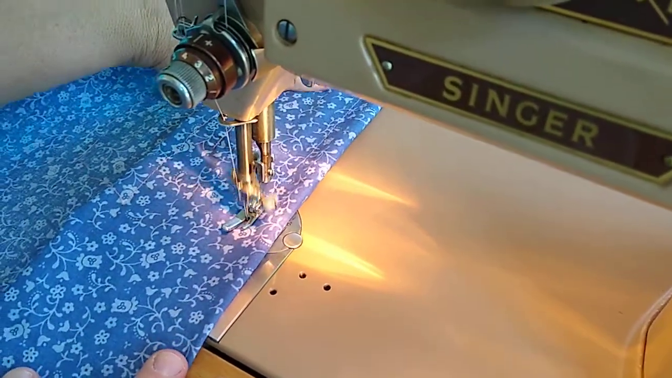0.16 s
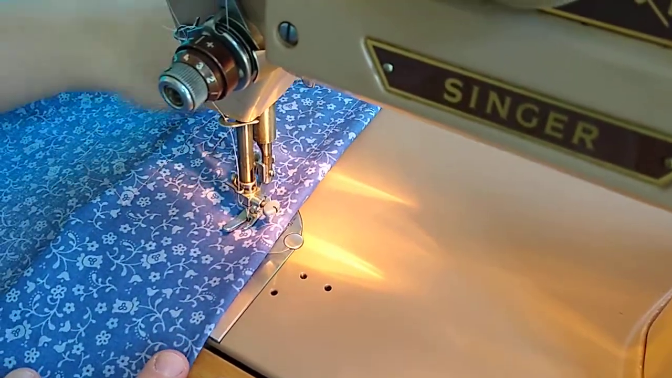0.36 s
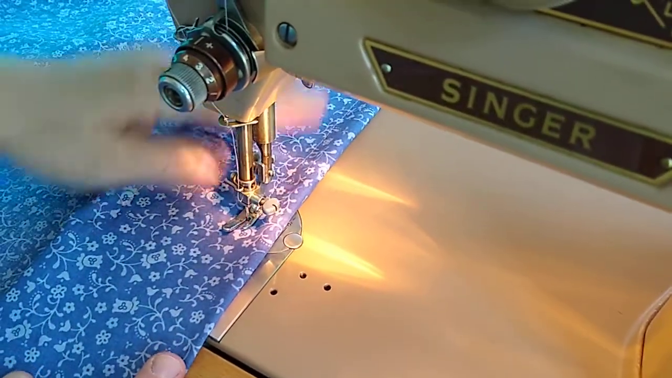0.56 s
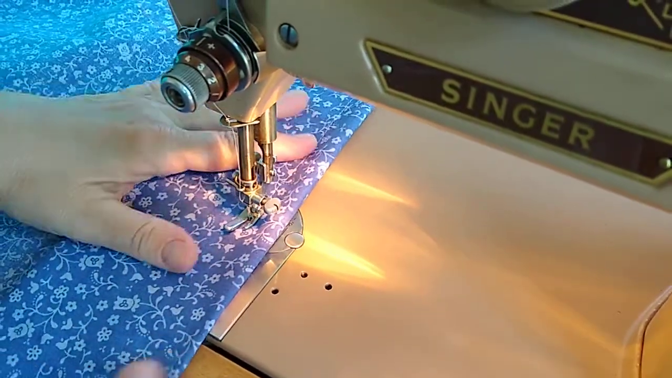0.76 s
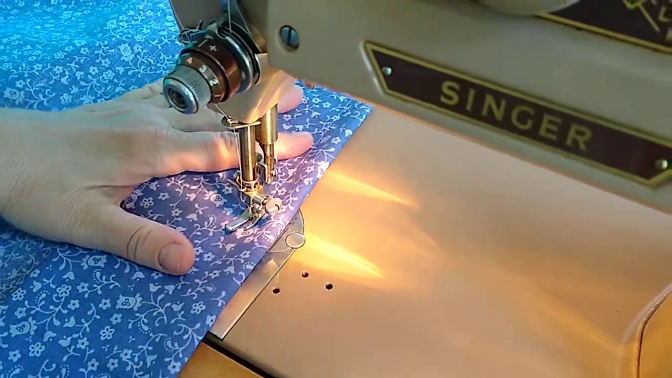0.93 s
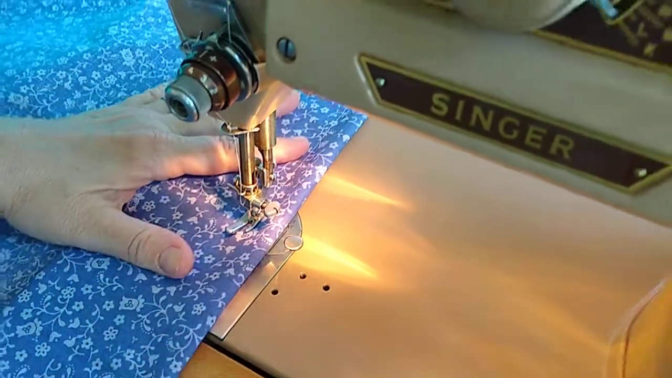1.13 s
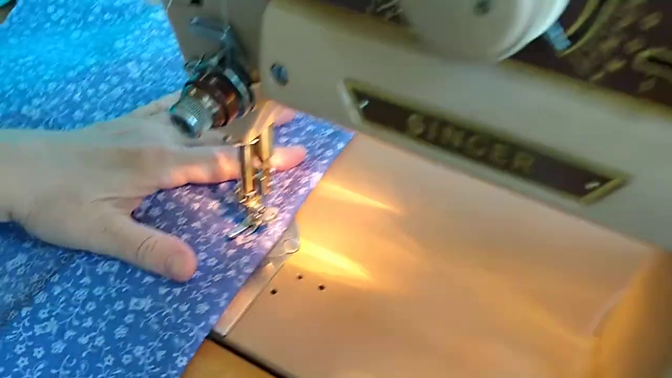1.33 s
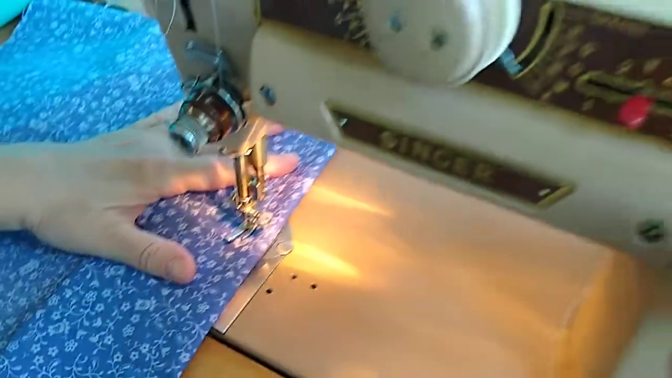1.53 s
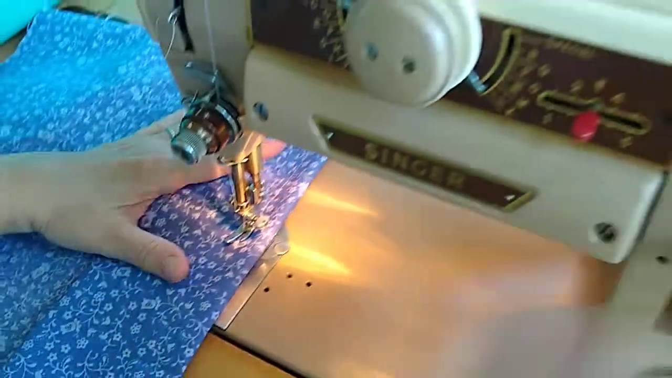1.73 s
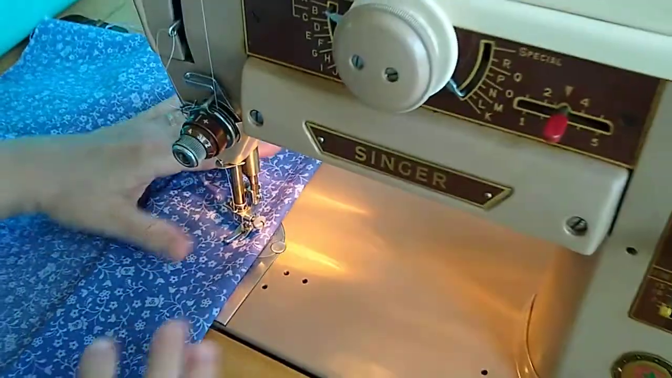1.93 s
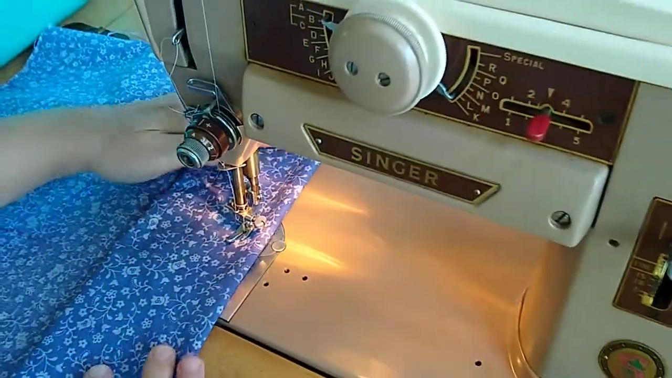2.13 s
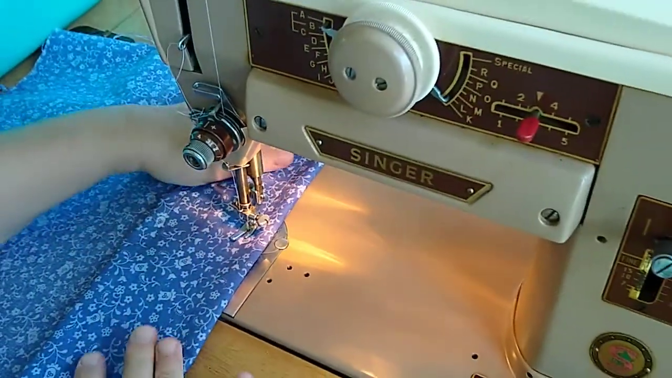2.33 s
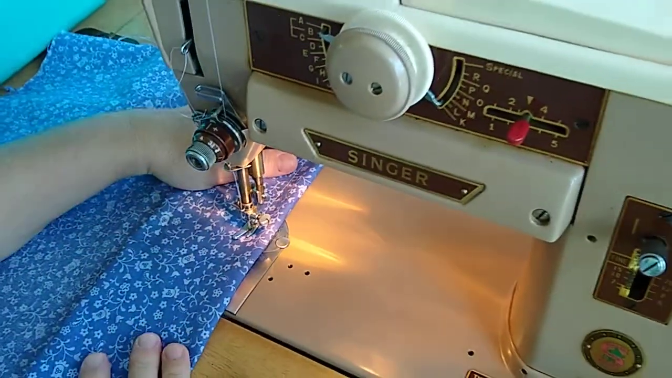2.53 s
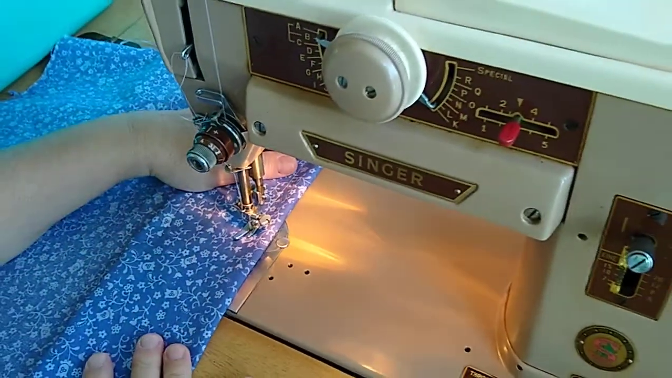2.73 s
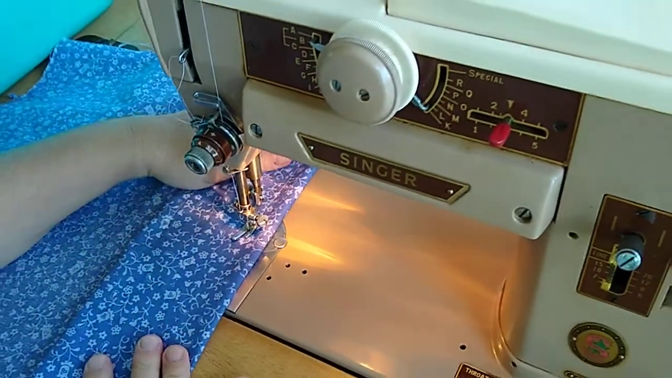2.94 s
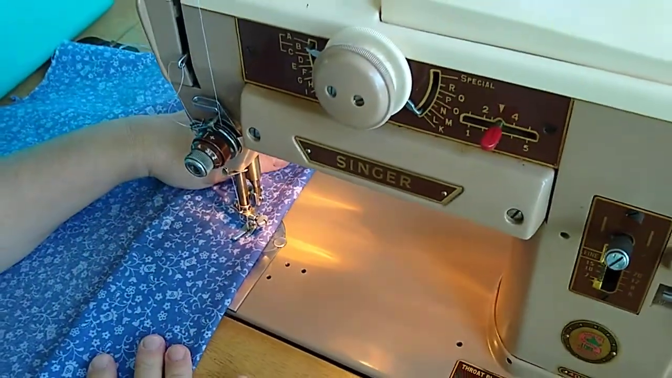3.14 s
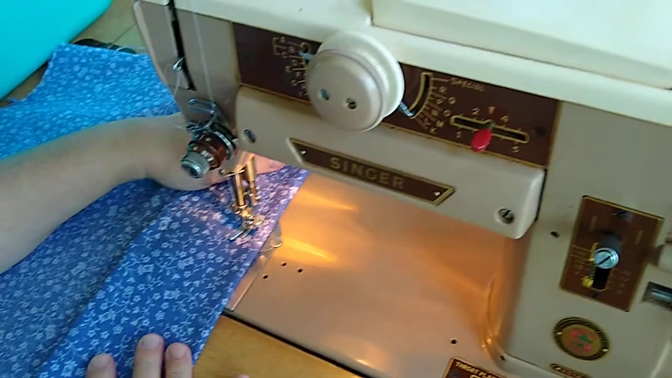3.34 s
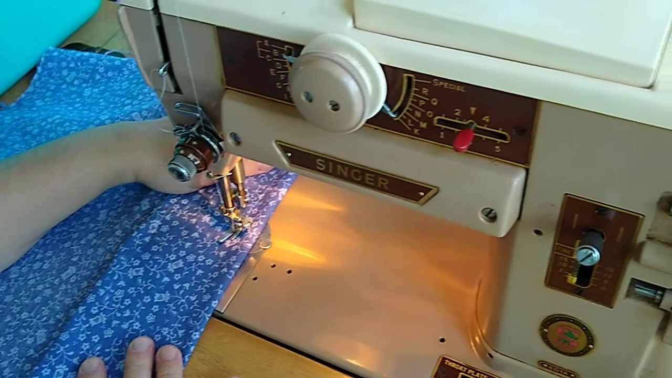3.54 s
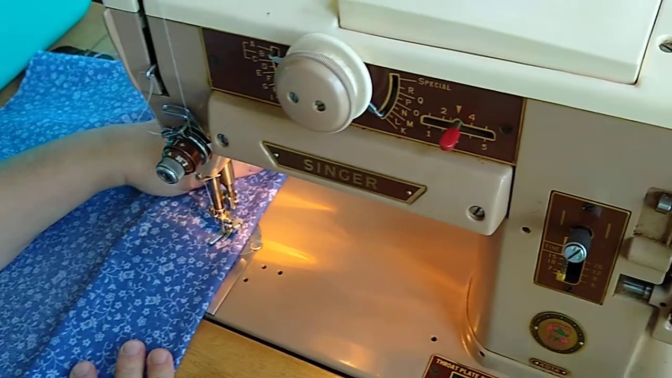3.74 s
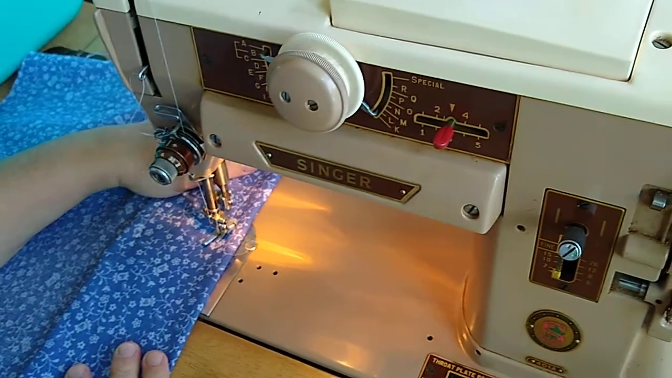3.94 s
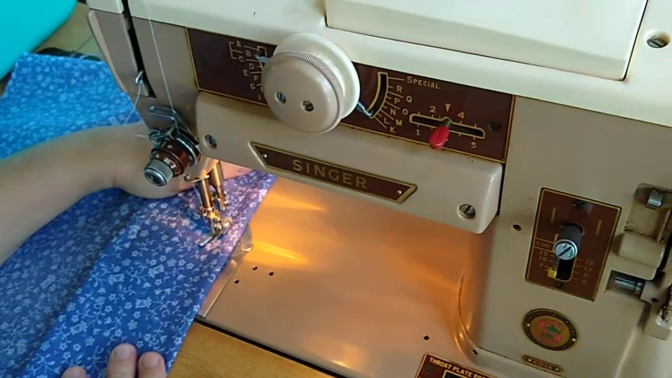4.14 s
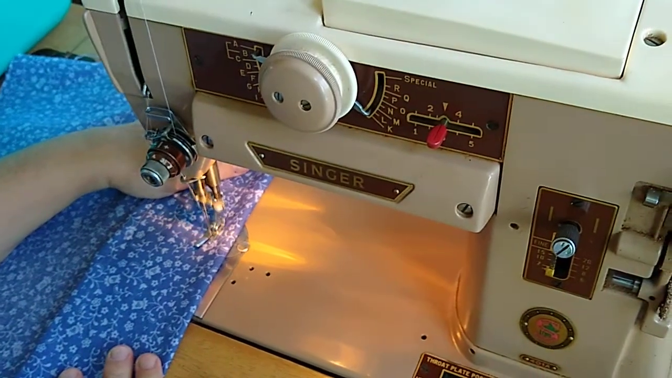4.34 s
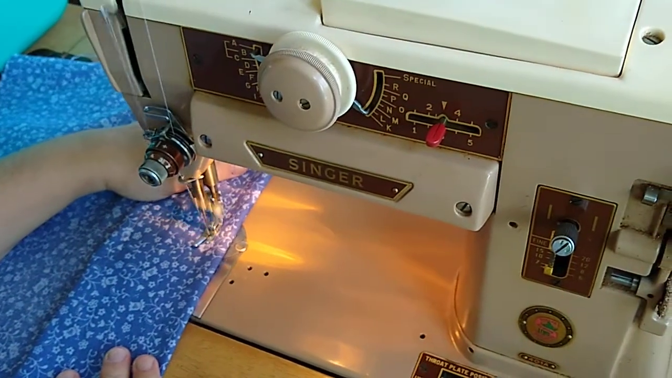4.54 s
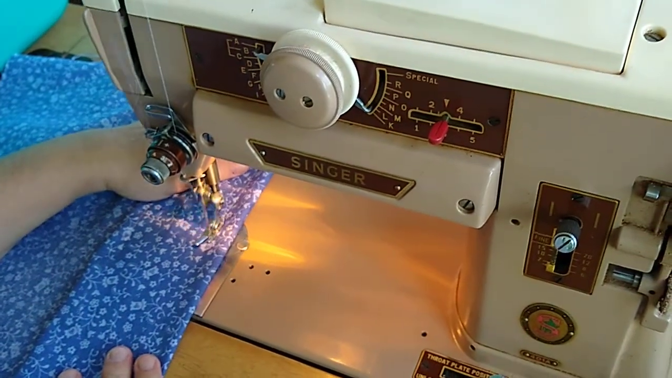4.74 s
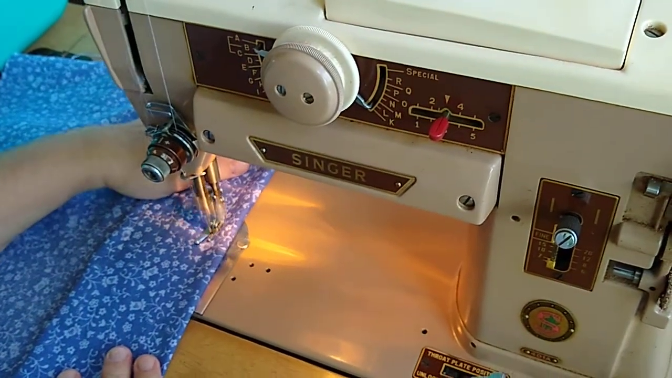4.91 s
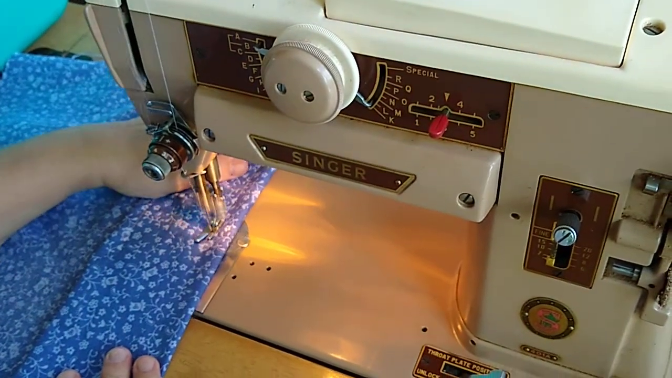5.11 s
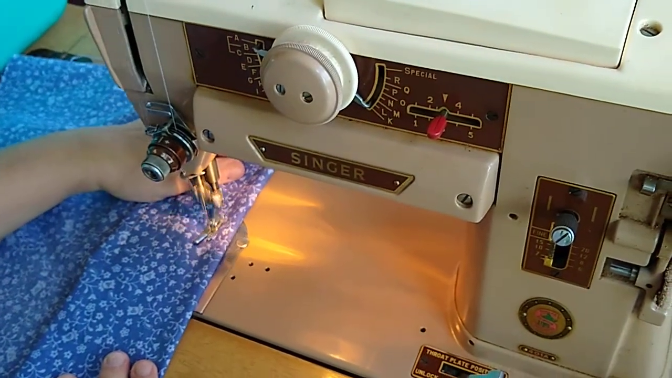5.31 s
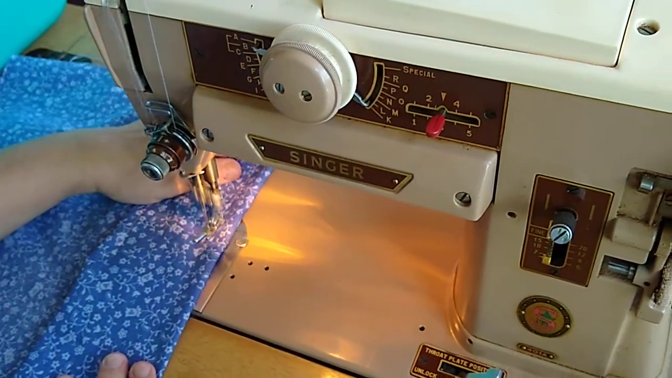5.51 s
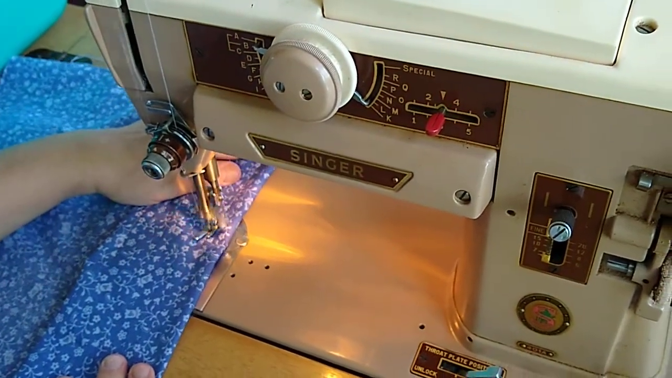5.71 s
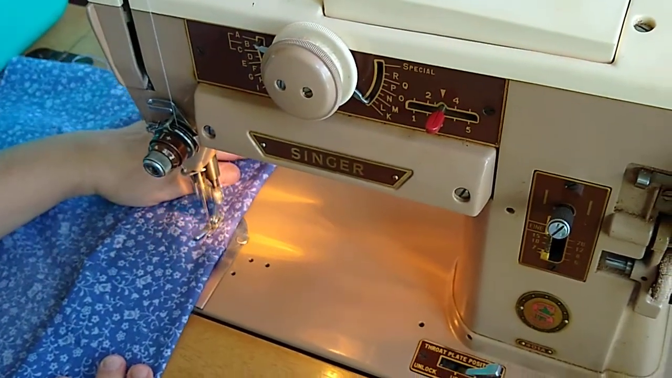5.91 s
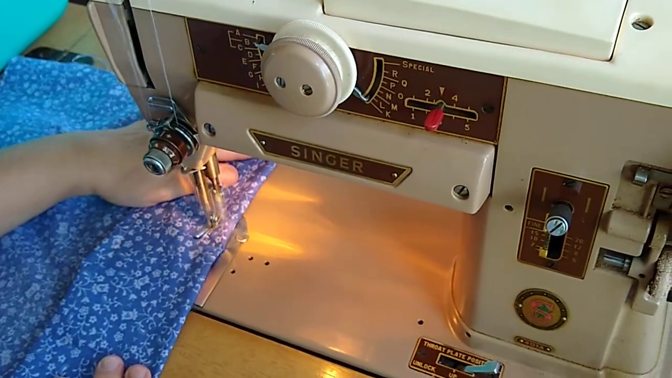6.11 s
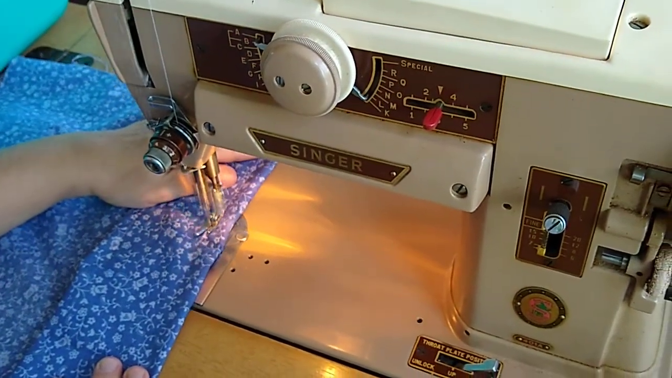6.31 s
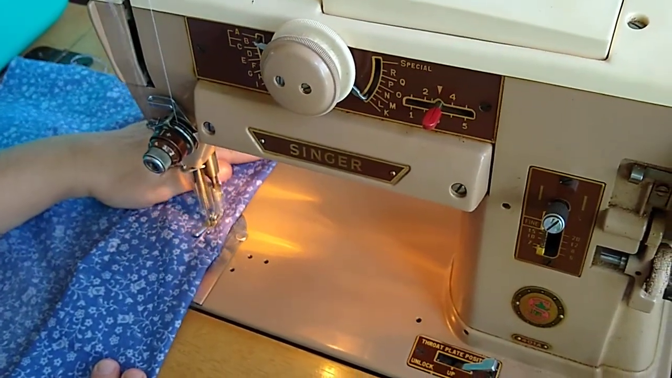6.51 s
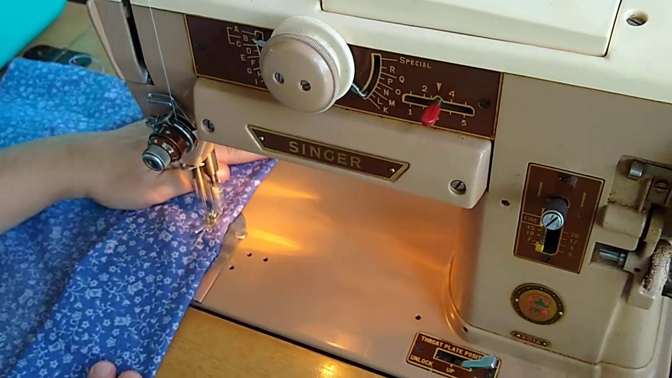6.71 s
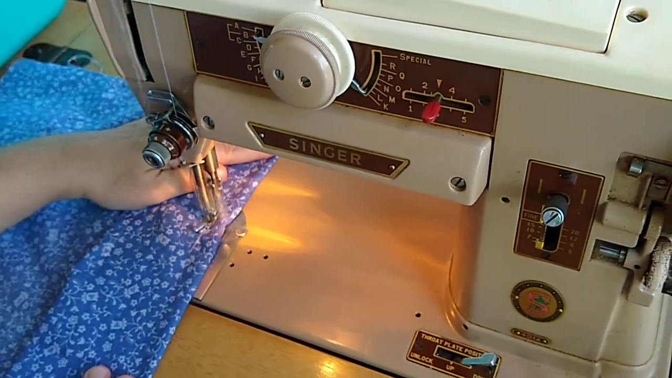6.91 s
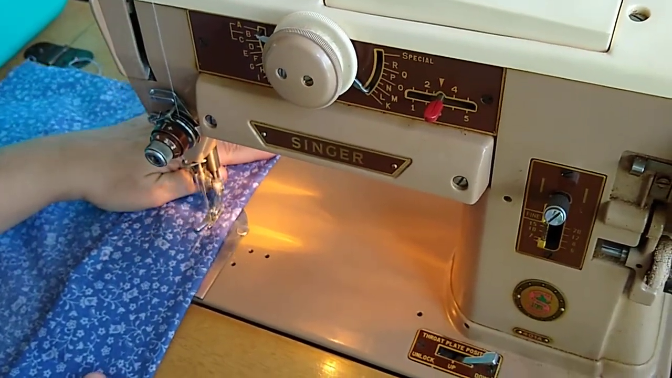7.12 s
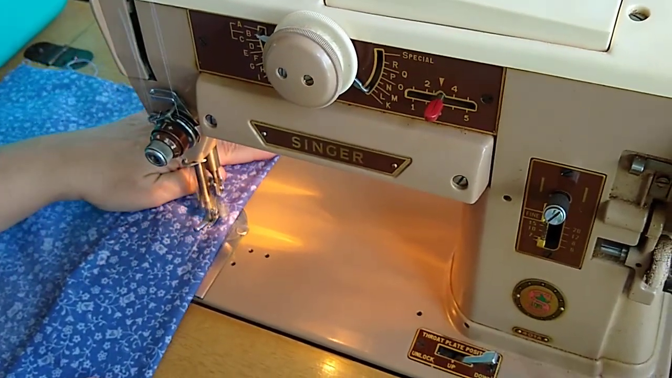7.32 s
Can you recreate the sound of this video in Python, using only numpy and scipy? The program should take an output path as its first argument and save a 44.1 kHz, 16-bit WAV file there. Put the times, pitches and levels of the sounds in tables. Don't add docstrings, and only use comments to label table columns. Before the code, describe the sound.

Close stereo pickup of a household sewing machine on a wooden table in a quiet room. It coasts out with two dull knocks, then leaves faint creaks and cloth rustle. A sharp metal lever snap breaks the hush. A thin electric buzz rises, a pedal thuds softly, and the machine abruptly starts, clattering faster until the end.

```python
import sys
import numpy as np
from scipy import signal
from scipy.fft import rfft, irfft, next_fast_len
from scipy.io import wavfile
from scipy.ndimage import map_coordinates

SR = 44100
rng = np.random.default_rng(int(sys.argv[2]) if len(sys.argv) > 2 else 0)


def volts_from_decibels(level):
    exponent = np.asarray(level, float) / 20
    return 10 ** exponent


def generate_wav(sig):
    pcm = np.round(np.clip(np.atleast_2d(sig).T, -1, 1) * 32767).astype(np.int16)
    wavfile.write(sys.argv[1], SR, pcm)


N = 324576
T = np.arange(N) / SR
MAINS_HZ = 60.0

# f/Hz, width/Hz, level/dB
CASTING_MODES = [(134.3, 8.3, 6), (186.2, 7.9, 9.5), (242.7, 13, 10), (285.3, 13.2, 5), (374, 15.5, 4),
                 (481, 5.4, 11.5), (540, 15.6, 11), (609.4, 24, 6.5), (752, 19, 8), (1018, 89, 0.5),
                 (1280, 71, -2.5), (1473, 77, 3), (1624, 19, -1), (1922, 26, 6.5), (2630, 7.2, -29),
                 (2994, 65, 4), (5510, 79, 1.5)]
# f/Hz, density/dB
GEAR_SPECTRUM = [(100, -60.5), (300, -3), (700, -3.5), (1100, -1), (1500, -3.5), (2200, 3), (2950, -3),
                 (3500, -7.5), (4300, -6), (5200, -11), (6500, -9.5), (8000, -23)]
NEEDLE_BAR_SPECTRUM = [(5000, 7), (7500, -4), (10000, 3), (13000, 0.5), (15500, -2)]
KNOCK_SPECTRUM = [(60, 6.5), (110, 1.5), (170, 8.5), (260, 8.5), (400, 2), (650, 1), (1000, -1), (1500, -2),
                  (2200, -1), (3000, -4.5), (4000, -8), (5500, -18.5), (7500, -24.5), (11000, -24),
                  (15000, -30)]
THUD_SPECTRUM = [(60, -23), (110, 2), (170, 2.5), (260, 0), (400, -3.5), (650, -14.5), (1000, -13.5),
                 (1500, -20), (2200, -24), (3000, -28), (4000, -31), (5500, -39), (7500, -54), (11000, -47),
                 (15000, -53)]
# f/Hz, width/Hz, level/dB
WOOD_MODES = [(259, 31, 7.5), (432, 110, 6), (570, 87, 10.6), (774, 46, 1.5), (906, 72, 3.7),
              (1164, 120, 4.5), (2630, 79, 8.1)]


def unit(x):
    return x / np.sqrt(np.mean(x ** 2) + 1e-20)


def along(points, hz):
    f, v = np.transpose(points)
    return np.interp(np.log(hz + 1), np.log(f + 1), v)


def curves(rows, outside=-120):
    s, *cols = np.transpose(rows)
    return [np.interp(T, s, c, outside, outside) for c in cols]


def wobble(rate_hz):
    knots = rng.standard_normal(int(N * rate_hz / SR) + 4)
    return map_coordinates(knots, [T * rate_hz])


def filtered(x, response):
    m = 2 * next_fast_len(x.shape[-1] // 2 + 4096)
    spectrum = rfft(x, m) * response(np.fft.rfftfreq(m, 1 / SR))
    return irfft(spectrum, m)[..., :x.shape[-1]]


def colour(spectrum, modes=()):
    def response(f):
        resonance = 1 + sum(volts_from_decibels(db) / (1 + (2 * (f - c) / w) ** 2) for c, w, db in modes)
        low_cut = (f / 40) ** 4 / (1 + (f / 40) ** 4)
        return volts_from_decibels(along(spectrum, f)) * resonance * low_cut
    return response


def causal(response):
    def shaped(hz):
        cepstrum = irfft(np.log(response(hz) + 1e-6))
        half = len(cepstrum) // 2
        cepstrum[1:half] *= 2
        cepstrum[half + 1:] = 0
        return np.exp(rfft(cepstrum))[:len(hz)]
    return shaped


def struck(x, response):
    gain = np.sqrt(np.mean(response(np.linspace(0, SR / 2, 4096)) ** 2))
    return filtered(x, causal(response)) / gain


def dying(kicks, t60_s):
    envelope = signal.lfilter([1], [1, -volts_from_decibels(-60 / (t60_s * SR))], kicks)
    return envelope * rng.standard_normal((2, N))


def rattle(rate_hz, spread_db, t60_s, share):
    size = np.minimum(rng.exponential(size=N), 2.8)
    kicks = (rng.random(N) < rate_hz / SR) * volts_from_decibels(spread_db * size)
    jolts = unit(signal.lfilter([1], [1, -volts_from_decibels(-60 / (t60_s * SR))], kicks))
    return (1 - share + share * jolts) * rng.standard_normal((2, N))


def hits(events, body, tail_db, tail_t60, shut_t60, rise, push=0):
    out, t = np.zeros((2, N + SR)), np.arange(SR // 5) / SR
    for s, db, t60, hold, pan_db in events:
        tail = volts_from_decibels(tail_db - 60 * t / tail_t60 - 60 * np.maximum(t - hold, 0) / shut_t60)
        envelope = (volts_from_decibels(-60 * t / t60) + tail) * (1 - np.exp(-t / rise))
        burst = envelope * rng.standard_normal((2, len(t)))
        burst[:, 0] -= push
        level = volts_from_decibels(db + np.array([[pan_db], [-pan_db]]) / 2)
        out[:, round(s * SR):][:, :len(t)] += level * burst
    return struck(out[:, :N], body)


def shaft():
    # t/s, stitch rate/Hz
    speed = [(4.55, 3.877), (5.0, 4.508), (5.4, 6.187), (5.8, 6.684), (6.3, 7.28), (6.8, 7.81),
             (7.36, 7.69)]
    # t/s, effort/dB
    drive = [(4.05, -25), (4.35, -19), (4.438, -19), (4.45, -4.5), (4.7, -1), (4.8, -2.5), (5.1, 0.5),
             (5.5, 0.5), (7.36, 0.5)]
    # t/s, effort/dB
    coast = [(0.0, -4), (0.05, -9), (0.2, -15.5), (0.23, -18.5), (0.35, -20.5)]
    rate_hz = np.interp(T, *np.transpose(speed))
    turns = np.cumsum(rate_hz) / SR
    turns_made = turns - np.interp(speed[0][0], T, turns)
    speed_db = 20 * np.log10(rate_hz / 7.7)
    effort_db = np.maximum(curves(drive)[0], curves(coast)[0])
    return rate_hz, turns_made, speed_db, effort_db


def linkage():
    # phase/turn, peak level/dB, brightness/dB
    contacts = [(0.141, -30, -8.5), (0.24, -22, -21), (0.364, -26.5, -12), (0.493, -28.5, -38),
                (.69, -25, -25), (.76, -25, -28), (0.906, -24, -16)]
    # t/s, peak level/dB, brightness/dB
    clacks = [(4.4438, -21.5, -24.5), (4.4813, -46, -1), (4.567, -25.5, -32), (4.59, -23, -18),
              (4.657, -29, -19), (4.699, -26, -30), (4.74, -41, -22), (4.9698, -25, -27), (5.1, -16.5, -20),
              (5.453, -14, -20), (5.885, -30, 0), (6.402, -18, -16), (6.734, -18, -26), (6.782, -17.5, -24),
              (6.842, -13, -20), (6.993, -17, -30), (7.225, -27.5, -0.5), (4.515, -35, -28),
              (4.8309, -22, -15), (4.837, -25, -24), (4.8879, -21.5, -19.5), (5.046, -23.5, -15),
              (5.1652, -27, -26), (5.3114, -19.5, -15.5), (5.578, -21, -11), (5.658, -19, -25),
              (5.7234, -35, -20), (5.7826, -17, -28), (6.0552, -15, -22), (6.251, -18.5, -31),
              (6.2996, -30, -7), (6.5221, -29, -20), (6.912, -24, -22), (7.16, -22.5, -13),
              (7.2954, -16, -25), (4.552, -29, -26), (4.6338, -35, -22), (4.7949, -29, -22),
              (4.8169, -29, -20), (4.9621, -23, -22), (5.2868, -20, -17), (5.339, -30, -22),
              (5.395, -31, -22), (5.408, -31, -22), (5.763, -25, -22), (5.8143, -25, -22),
              (5.9708, -21, -17), (6.11, -17, -22), (6.354, -26, -22), (6.4362, -22, -20),
              (6.4714, -24, -22), (6.5456, -24, -26), (7.0306, -16, -22)]
    scatter_turn, scatter_db, grows, ordinary_db, same_blow_s = 0.0071, 2, 0.32, 1, .015
    _, turns, speed_db, _ = shaft()
    luck = rng.standard_normal((21, len(contacts), 2))
    phase, db, rel_db = np.transpose(contacts)
    stitch = 1 + np.arange(len(luck))[:, None]
    s = np.interp(stitch + phase + scatter_turn * luck[..., 0], turns, T)
    harder_db = grows * np.interp(s, T, speed_db)
    peak_db = db + harder_db + scatter_db * luck[..., 1]
    rows = np.stack([s, peak_db, rel_db - harder_db], axis=-1).reshape(-1, 3)
    apart = np.abs(rows[:, :1] - np.transpose(clacks)[0]).min(axis=1) > same_blow_s
    ordinary = rows[apart & (rows[:, 0] < T[-1])] - [0, ordinary_db, 0]
    return [*ordinary, *clacks]


def clatter():
    blows, bright = np.zeros((2, N))
    for s, db, rel_db in linkage():
        blows[round(s * SR)] = volts_from_decibels(db)
        bright[round(s * SR)] = volts_from_decibels(db + rel_db)
    casting = colour(GEAR_SPECTRUM, CASTING_MODES)
    clack = volts_from_decibels(-18.5) * struck(dying(blows, 0.12), casting)
    tick = volts_from_decibels(-4.5) * struck(dying(bright, 0.057), colour(NEEDLE_BAR_SPECTRUM))
    rap = volts_from_decibels(-9.5) * struck(dying(blows, 0.0023), casting)
    return clack + tick + rap


def running_gear():
    layers = [
        (-38.5, 1.21, 0.083, 0.67),
        (-36, 1.28, 1.35, 0.32),
        (-47, 2.4, 2.55, 0.62),
    ]
    # phase/turn, level/dB
    swell = [(0, -4.5), (.1, -1.5), (.17, -1), (.45, 0.95), (.58, -2), (.72, -0.2), (.9, -1.5), (1, -2)]
    # f/Hz, density/dB
    bed_spectrum = [(60, -43), (115, -2.5), (250, 4.5), (500, -4.5), (800, -13.5), (1500, -11), (3000, -60)]
    # f/Hz, width/Hz, level/dB
    cover = [(1036, 30, 7.5), (624.6, 19, 14.5), (880, 15, -3), (1120, 20, 6.5), (1357, 60, 10),
             (1474, 20, 12.5), (1652, 25, 1), (2780, 45, 10.5), (3000, 33, 12), (3300, 57, 13.5),
             (3750, 21, -8), (5170, 43, 12), (5560, 54, 5)]
    chatter_db = -41.5
    _, turns, speed_db, effort_db = shaft()
    swell_db = np.interp(turns % 1, *np.transpose(swell))
    swell_db = swell_db * volts_from_decibels(-0.89 * speed_db) * (turns > 0)
    bed_db, gear_db, bar_db = [db + push * effort_db + fast * speed_db + share * swell_db
                               for db, push, fast, share in layers]
    rumble = rattle(87, 3.5, 0.13, share=0.22)
    bed = volts_from_decibels(bed_db + 0.65 * wobble(25)) * unit(filtered(rumble, colour(bed_spectrum, CASTING_MODES)))
    teeth = rattle(220, 2.2, .025, share=.45)
    gears = volts_from_decibels(gear_db - 2.0) * unit(filtered(teeth, colour(GEAR_SPECTRUM, CASTING_MODES)))
    contacts = rattle(140, 1.6, .012, share=.25)
    bar = volts_from_decibels(bar_db + 2.0) * unit(filtered(contacts, colour(NEEDLE_BAR_SPECTRUM)))
    kicks = (rng.random((2, N)) < 300 / SR) * rng.uniform(-1, 1, (2, N))
    plate = unit(struck(kicks, colour(GEAR_SPECTRUM, cover)))
    chatter = volts_from_decibels(gear_db - layers[1][0] + chatter_db) * plate
    return bed + gears + bar + chatter


def whine():
    teeth_per_stitch, mesh_db, grows = 59.5, -49.5, 1.7
    _, turns, speed_db, _ = shaft()
    db = mesh_db + grows * speed_db - 120 * (turns < 0)
    phase = 2 * np.pi * teeth_per_stitch * turns + 0.71 * wobble(25)
    return volts_from_decibels(db + 1.5 + 1.5 * wobble(14)) * np.sin(phase)


def table():
    mode_hz, mode_db, grows = 86.75, -57, 0.56
    shake_order, shake_peak_db, shake_width_hz = 12.4, 4, 14
    creep_start_s, creep_s, wake_s, sag_hz = 4.05, 4.4, .3, 5.5
    rate_hz, _, _, effort_db = shaft()
    detune_hz = shake_order * rate_hz - mode_hz
    meets_db = shake_peak_db / (1 + (2 * detune_hz / shake_width_hz) ** 2)
    db = mode_db + grows * effort_db + meets_db
    awake = np.clip((T - creep_start_s) / wake_s, 0, 1)
    hz = mode_hz - sag_hz * np.clip((creep_s - T) / wake_s, 0, 1) + .15 * wobble(5.5)
    unsteady_db = .9 * wobble(9)
    mains = volts_from_decibels(-67 + effort_db + unsteady_db) * np.sin(4 * np.pi * MAINS_HZ * T)
    pan_db = np.array([[1.9], [-1.9]])
    hum = volts_from_decibels(db + 12 + unsteady_db + pan_db) * np.sin(2 * np.pi * np.cumsum(hz) / SR)
    return awake * (hum + mains)


def last_strokes():
    # t/s, peak level/dB, blow t60/s, gate hold/s, pan/dB
    knocks = [
        (0.0016, -29.5, 0.023, 0.06, -6),
        (0.04, -21, 0.039, 0.08, -2.5),
        (0.047, -18.5, 0.019, 0.063, 4),
        (0.145, -27.5, 0.031, 0.077, 3),
        (0.1485, -16.5, 0.018, 0.07, -5.5),
        (0.031, -29.5, 0.027, 0.02, 0),
        (0.141, -35, 0.023, 0.02, -6),
        (0.075, -39, 0.04, 0.03, -3),
        (0.193, -36, 0.02, 0.013, 3),
    ]
    return volts_from_decibels(-3.5) * hits(knocks, colour(KNOCK_SPECTRUM, CASTING_MODES),
                            tail_db=-20.0, tail_t60=0.18, shut_t60=0.026, rise=0.0018)


def thread_guide():
    # t/s, peak level/dB
    pings = [(4.6565, -30.5), (4.5885, -43), (4.4845, -32), (4.842, -28), (4.5, -29), (4.461, -40),
             (4.638, -48), (4.648, -48), (4.776, -42), (5.0, -40), (4.4, -43), (4.709, -43), (4.727, -41),
             (4.744, -47), (4.915, -38), (4.988, -45)]
    events = [(*row, 0.0088, .02, 0) for row in pings]
    return volts_from_decibels(-5) * hits(events, colour(NEEDLE_BAR_SPECTRUM),
                          tail_db=-30, tail_t60=0.1, shut_t60=.03, rise=0.00019)


def small_parts():
    # t/s, peak level/dB
    ticks = [(0.003, -42), (0.041, -23.5), (0.149, -26.5), (0.415, -60), (0.444, -44), (1.1363, -56),
             (1.558, -42.5), (1.7504, -31), (1.956, -60), (4.046, -55), (4.16, -56), (4.19, -57),
             (4.293, -53.5), (4.458, -37), (4.484, -55), (4.6565, -33), (4.775, -35)]
    # f/Hz, density/dB
    tick_spectrum = [(200, 4.5), (900, -7.5), (2000, -1.5), (3000, 0.5), (5500, -6), (8000, -10),
                     (12000, -17), (15500, -7)]
    events = [(*row, 0.0207, 0.032, 0) for row in ticks]
    return volts_from_decibels(-7.5) * hits(events, colour(tick_spectrum),
                            tail_db=-19.5, tail_t60=0.1, shut_t60=.03, rise=0.00028)


def buzz():
    # t/s, lamination level/dB
    stall = [(2.3, -91), (2.52, -95), (2.62, -88), (2.75, -87.5), (3.3, -85.5), (3.47, -85), (3.56, -91.5),
             (3.93, -92.5), (4.0, -89), (4.1, -92), (4.15, -96.5), (4.4, -100)]
    # f/Hz, level/dB
    laminations = [(1500, -25), (1680, -7), (1800, -14), (1920, 3), (2040, -8), (2400, -1), (2640, -5),
                   (3000, -2), (3120, -5), (3240, 1), (3360, 2), (3480, -5), (3600, -12), (3720, -8),
                   (3960, -7), (4200, -11), (4680, -11), (5160, -12), (5760, -14), (6100, -22), (7000, -30),
                   (8600, -28), (10500, -20), (12600, -22), (13200, -34)]
    # f/Hz, density/dB
    spark_spectrum = [(4000, 2), (5500, 3.5), (7500, -7), (9000, -3), (10500, 2.5), (12600, 2),
                      (13600, -14), (15500, -20)]
    iron_db, = curves(stall)
    fizz_db = -72 + 2.7 * (iron_db - iron_db.max())
    cycle = 2 * MAINS_HZ * T % 1
    orders, turn = np.arange(14, 110), np.linspace(0, 1, num=4096)
    scatter_db = 1.2 * rng.standard_normal((2, len(orders)))
    strength = volts_from_decibels(along(laminations, 2 * MAINS_HZ * orders) + scatter_db)
    snap = strength @ np.cos(2 * np.pi * np.outer(orders, turn) + .15 * orders[:, None] ** 2)
    iron = np.array([np.interp(cycle, turn, port) for port in snap])
    iron = iron * volts_from_decibels(iron_db + 4 + 1.5 * wobble(12))
    sparks = np.exp(-4 * cycle) * rng.standard_normal((2, N))
    fizz = volts_from_decibels(fizz_db - 4.0) * unit(filtered(sparks, colour(spark_spectrum)))
    return iron, fizz


def lever():
    # t/s, peak level/dB, blow t60/s, gate hold/s, pan/dB
    snaps = [
        (1.478, -12.5, 0.018, 0.1, 0.00051),
        (1.4812, -16.5, 0.00652, 0.13, 0.0048),
    ]
    # f/Hz, density/dB
    snap_spectrum = [(60, -7.5), (110, -17.5), (170, -19), (260, -15), (400, -32), (650, -13), (1000, 8.5),
                     (1500, -6.5), (2200, 15), (3000, 6), (4000, -1.5), (5500, -1), (7500, -5.5),
                     (11000, -6), (15000, 8.5)]
    # f/Hz, width/Hz, level/dB
    lever_modes = [(283, 47, 8), (580, 79, 9.9), (910, 57, 8.7), (1210, 75, 1.6), (2200, 120, 13),
                   (2760, 37, 2), (5870, 120, 3.8), (11200, 1000, 9.8)]
    crack = volts_from_decibels(-0.5) * hits(snaps, colour(snap_spectrum, lever_modes),
                             tail_db=-34.5, tail_t60=0.22, shut_t60=.03, rise=0.00019, push=2.98)
    echo = volts_from_decibels(-19.5) * hits(snaps, colour(KNOCK_SPECTRUM, lever_modes),
                             tail_db=-5.0, tail_t60=0.21, shut_t60=.03, rise=0.00082)
    return crack + echo


def pedal():
    # t/s, peak level/dB, blow t60/s, gate hold/s, pan/dB
    thuds = [
        (3.473, -19, 0.027, 0.071, 0),
        (3.4805, -18.5, 0.028, 0.077, 0),
        (3.487, -38, 0.025, 0.069, 0),
    ]
    return volts_from_decibels(-9.5) * hits(thuds, colour(THUD_SPECTRUM, WOOD_MODES),
                            tail_db=-9.0, tail_t60=0.28, shut_t60=0.034, rise=0.001, push=6.9)


def soft_bumps():
    # t/s, peak level/dB
    bumps = [(0.048, -30), (0.15, -31), (0.305, -43), (0.438, -45.5), (2.426, -50), (2.78, -47),
             (3.049, -47), (3.347, -42), (3.372, -48), (3.568, -42), (3.814, -46.5), (4.045, -40.5),
             (4.065, -50), (4.329, -44), (4.403, -43)]
    events = [(*row, 0.035, 0.12, 0) for row in bumps]
    return volts_from_decibels(-3.5) * hits(events, colour(THUD_SPECTRUM, WOOD_MODES),
                            tail_db=-10.5, tail_t60=0.22, shut_t60=.1, rise=.006)


def squeaks():
    # t/s, length/s, f/Hz, level/dB
    creak_rows = [(.3, .2, 2080, -80), (.36, .05, 2830, -77), (.44, .04, 2850, -75), (.41, .15, 3050, -77),
                  (.56, .1, 2630, -76), (.5, .1, 2850, -81), (.56, .08, 1980, -80), (.64, .06, 2400, -82),
                  (.69, .03, 2720, -80), (1.09, .07, 2330, -72), (1.165, .12, 2815, -75),
                  (1.11, .03, 2900, -79), (1.2, .06, 2450, -80), (1.27, .08, 2030, -79)]
    t, waver = T[:2 * SR], 2.2 * wobble(145)[:2 * SR]
    creaks = np.zeros(N)
    for s, length_s, hz, db in creak_rows:
        swell = np.exp(-((t - s) / (length_s / 2)) ** 2)
        tone = np.sin(2 * np.pi * hz * (t - s) * (1 - .12 * (t - s)) + waver)
        creaks[:2 * SR] += volts_from_decibels(db) * swell * tone
    return volts_from_decibels(2.3 * wobble(69.0) + 2.0 + np.array([[-3], [3]])) * creaks


def cloth():
    # t/s, half length/s, level/dB
    rustle = [(.2, .1, -80), (.6, .05, -84), (0.813, 0.081, -76.5), (1.23, .03, -81), (1.53, .06, -80),
              (1.76, 0.028, -80), (3.772, .08, -82), (4.07, .05, -80), (4.26, .05, -86)]
    strokes = volts_from_decibels(-100) + sum(volts_from_decibels(db) * np.exp(-((T - s) / half) ** 2) for s, half, db in rustle)
    fibres = rattle(300, 2, .02, share=.2)
    return volts_from_decibels(-3.5) * strokes * unit(filtered(fibres, colour(NEEDLE_BAR_SPECTRUM)))


def room():
    # t/s, level/dB
    air = [
        (0.0, -62.5),
        (7.36, -59.5),
    ]
    # f/Hz, density/dB
    room_spectrum = [(35, -15), (70, -2), (110, 2.5), (170, -3), (260, -9), (400, -9), (650, -12.5),
                     (1000, -14), (1500, -20.5), (2200, -18.5), (3000, -23.5), (4000, -27), (5500, -35.5),
                     (7500, -39.5), (11000, -42.5), (15000, -38.5)]
    # f/Hz, width/Hz, level/dB
    room_modes = [(179, 20, 5.5), (233, 14, 9.5), (291.8, 4.4, 17.5), (482.5, 11.5, 9), (577.5, 12, 6.5),
                  (661, 4.3, 12.5)]
    noise = filtered(rng.standard_normal((2, N)), colour(room_spectrum, room_modes))
    return volts_from_decibels(curves(air, -62)[0] + 0.45 * wobble(7.0)) * unit(noise)


def ports(pair):
    # f/Hz, likeness of the ports/1
    alike = [(60, 0.85), (150, 1), (300, 0.91), (700, 0.55), (1200, 0.28), (3000, 0.083), (8000, 0.076)]

    def split(hz):
        turn = np.arccos(np.clip(along(alike, hz), -1, 1)) / 2
        return np.array([np.cos(turn), np.sin(turn)])
    mid, side = filtered(pair, split)
    return np.array([mid + side, mid - side])


def scene():
    # f/Hz, left minus right/dB
    port_balance = [(60, 1.2), (500, 1.2), (1200, -1.5), (2000, -1.2), (4000, 0), (6500, 1), (8000, 11),
                    (11000, 10.5), (15000, 7)]
    iron, fizz = buzz()
    machine = running_gear() + clatter() + last_strokes() + thread_guide() + small_parts() + fizz
    around = lever() + pedal() + soft_bumps() + cloth() + room()
    heard = ports(machine + around) + iron + squeaks() + whine()
    tilt = np.array([[.5], [-.5]])
    return filtered(heard, lambda hz: volts_from_decibels(tilt * along(port_balance, hz))) + table()


def low_pass(x):
    return signal.sosfilt(signal.butter(12, 16820, fs=SR, output="sos"), x)


def record(dry):
    # f/Hz, share/1
    into_left = [(100, .72), (600, .85), (2200, .95), (4400, .95), (6600, .72), (7600, .3), (9000, .1)]
    # f/Hz, share/1
    into_right = [(100, .72), (600, .85), (2200, .95), (4400, .93), (6600, .6), (7600, .3), (9000, .2)]
    # f/Hz, delay/samples
    lag = [(2200, 19.9), (6800, 19.7), (7600, 18.5)]
    # f/Hz, density/dB
    hiss_spectrum = [(1500, -6), (2200, -1.5), (4500, 3), (7000, -4), (10000, -11), (15000, -10)]
    top_hz, steepness, leak_db = 15480, 150, -28

    def feed(hz):
        share = np.array([along(into_left, hz), along(into_right, hz)])
        return share * np.exp(-2j * np.pi * hz * along(lag, hz) / SR)
    cross = filtered(dry[::-1], feed)
    hiss = volts_from_decibels(-83) * unit(filtered(rng.standard_normal((2, N)), colour(hiss_spectrum)))
    mix = filtered(dry - cross + hiss, lambda hz: volts_from_decibels(leak_db) + 1 / (1 + (hz / top_hz) ** steepness))
    return low_pass(mix)


dry = scene()
out = record(dry)
generate_wav(out)
```